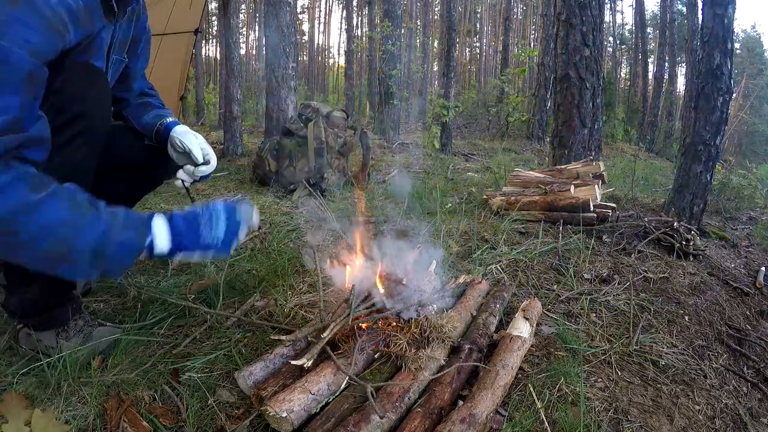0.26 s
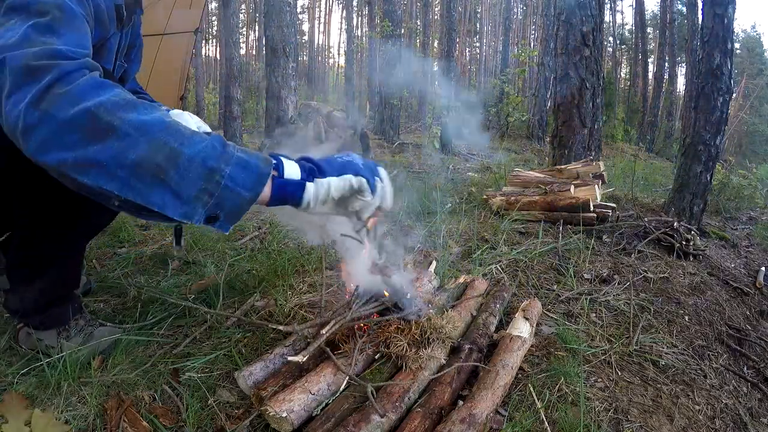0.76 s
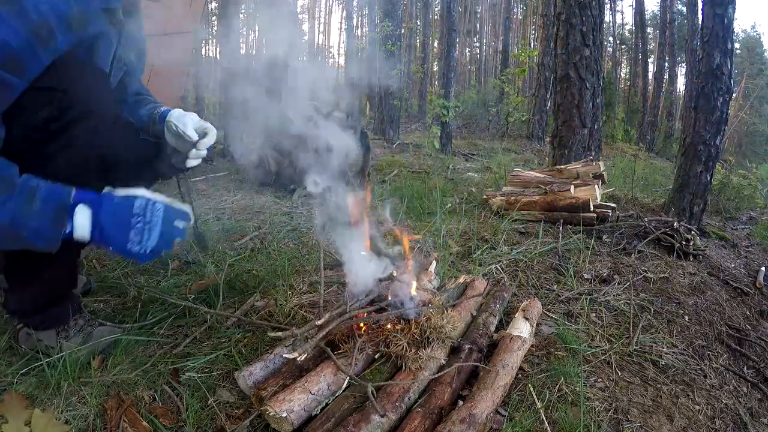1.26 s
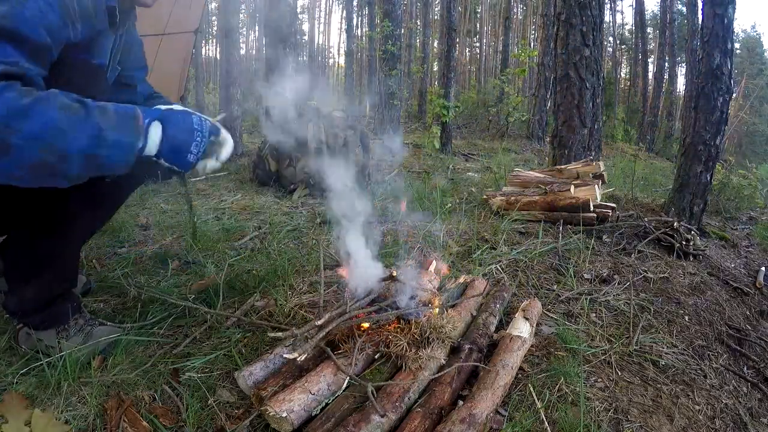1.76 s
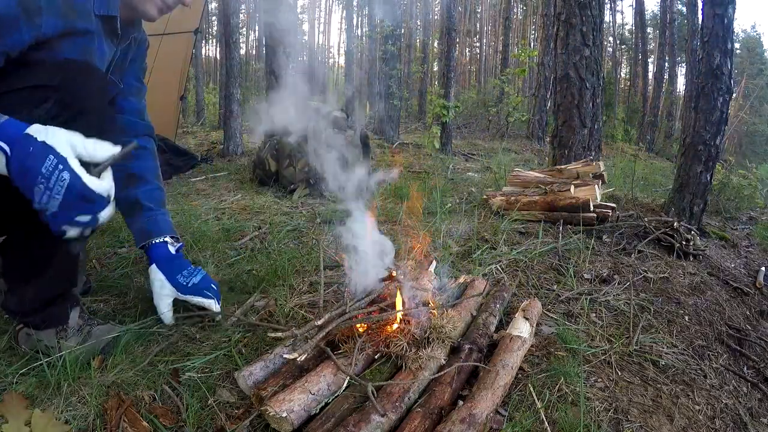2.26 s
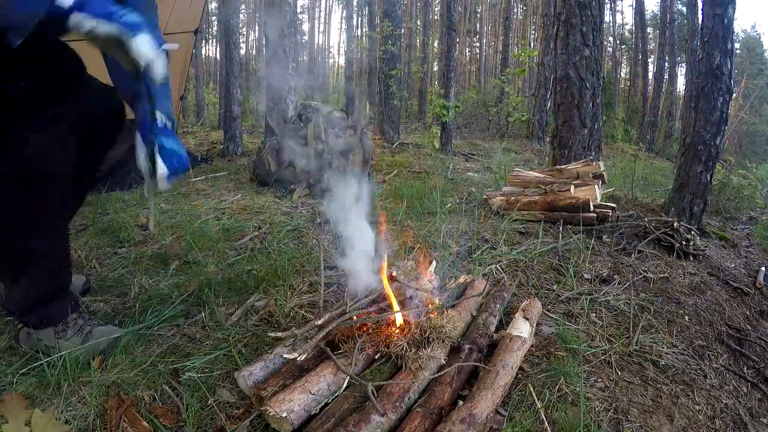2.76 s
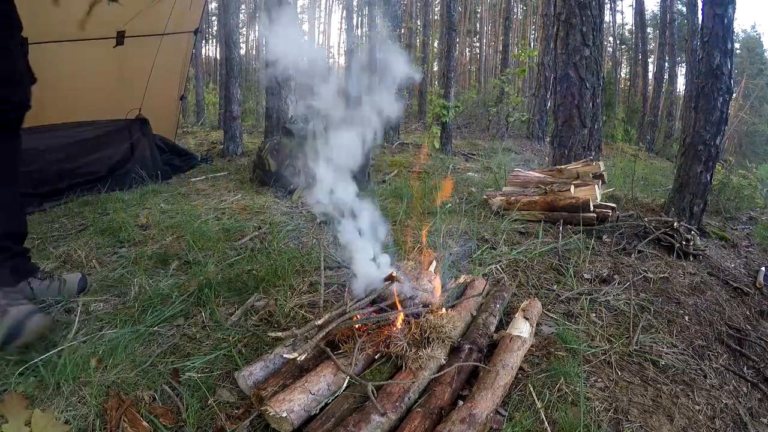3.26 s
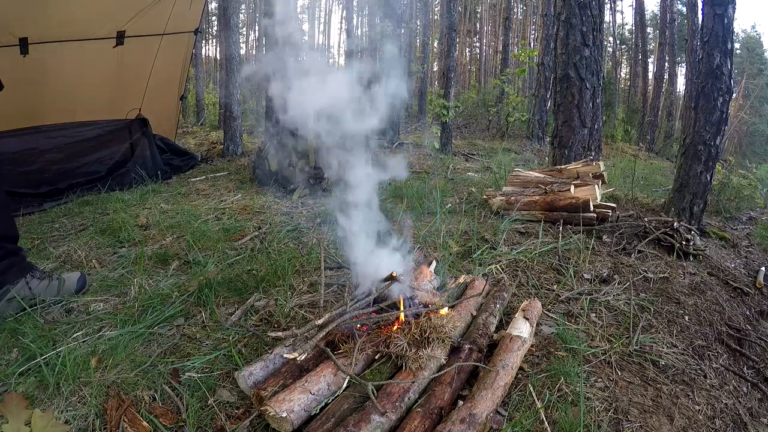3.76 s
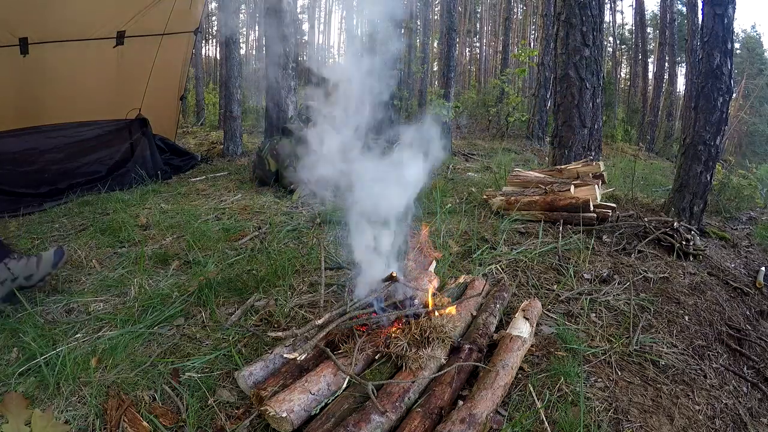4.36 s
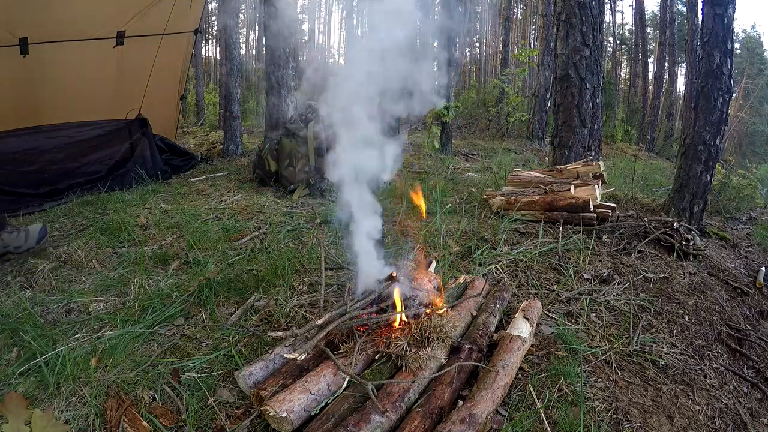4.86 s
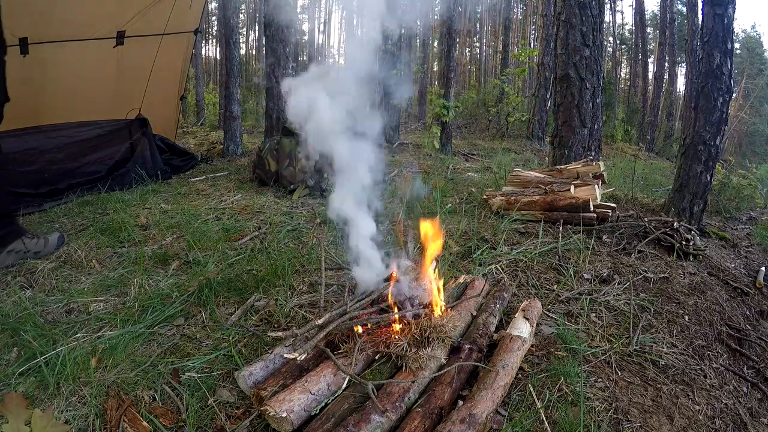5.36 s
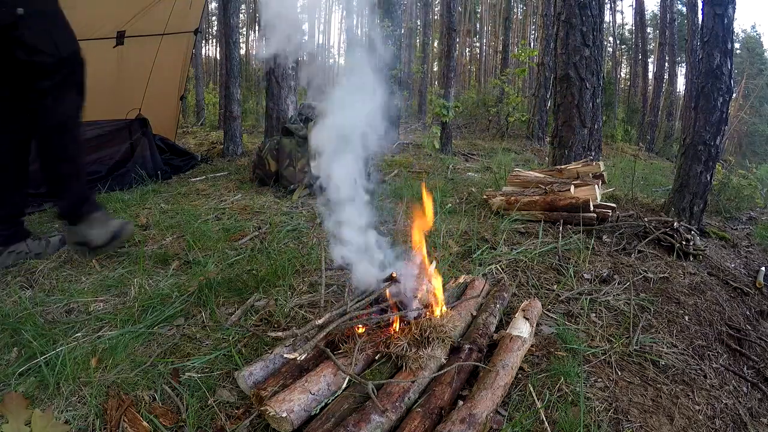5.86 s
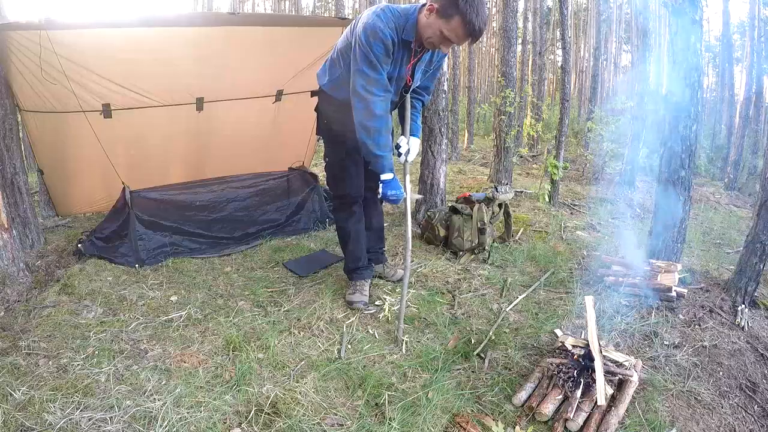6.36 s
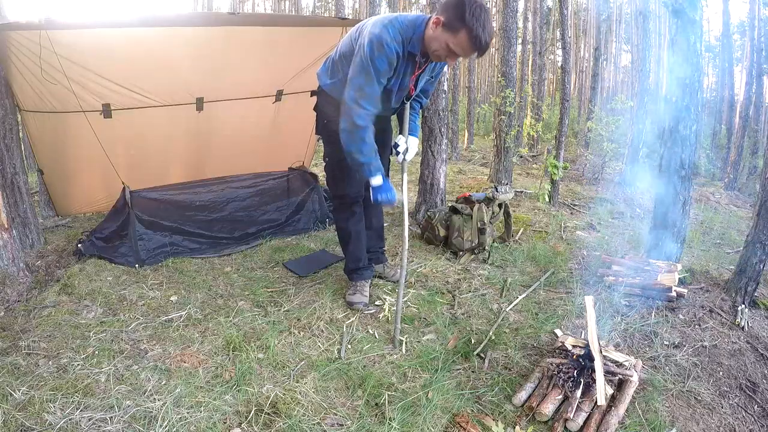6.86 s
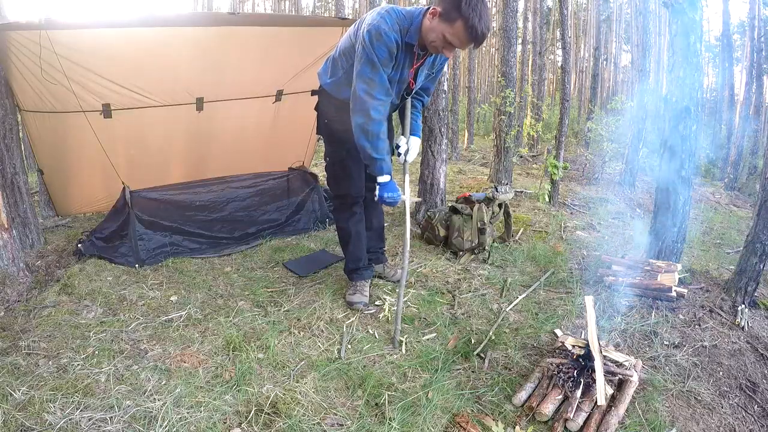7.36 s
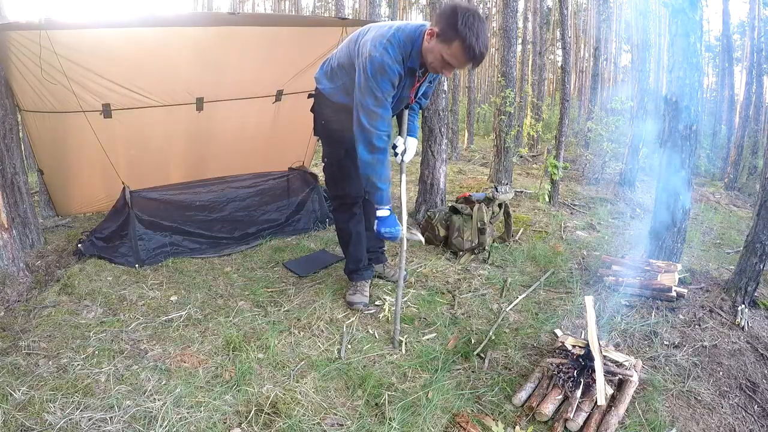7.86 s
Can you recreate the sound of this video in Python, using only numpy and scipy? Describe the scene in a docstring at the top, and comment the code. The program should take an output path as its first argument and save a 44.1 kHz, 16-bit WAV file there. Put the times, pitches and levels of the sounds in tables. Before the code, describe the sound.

A small fire of dry grass and twigs burns close to the microphone in a quiet pine forest. From the start, fine irregular crackle, thin hiss and low fluttering flames run under sharp dry snaps, one strong at 0.55 s, more at 1.5 to 1.9 s. Soft low puffs of gas come between them. From 2.2 to 3.5 s the snaps are densest and loudest, peaking with a hard crack at 3.5 s. They then thin out, with a soft puff near 5.2 s and another cluster from 5.6 to 6.1 s. Light boot scuffs in grass pass around 2.2, 3.9 and 5.9 s; far chirps and low hoots at 3.3 and 5.7 s are faint. At 6.3 s the fire stops instantly. Quiet, slightly bassy air remains, with distant chirps clustering around 6.8 to 7.4 s and very faint knife scrapes on a stick until about 7.8 s.

```python
"""A fire of dry grass and twigs burns on logs in a pine forest, close to the microphone.
From the start there is quiet air, and hiss, fluttering flames and crackle made from noise and tiny pulses.
Far birds (gliding tones), sharp snaps (ringing pulses), boots in grass (grainy noise) and soft puffs join in.
At about 6.3 s the fire sound stops at once; the air and birds go on.
Then a knife strokes faintly along a stick (short bands of noise)."""
import sys
import numpy as np
from scipy import signal
from scipy.fft import rfft, irfft, next_fast_len
from scipy.io import wavfile
from scipy.ndimage import uniform_filter1d

SR = 44100
rng = np.random.default_rng(int(sys.argv[2]) if len(sys.argv) > 2 else 0)


def store_wav(level_fs):
    """Save 16-bit WAV to argv[1]."""
    pcm = np.round(np.clip(np.atleast_2d(level_fs), -1, 1) * 32767)
    wavfile.write(sys.argv[1], SR, pcm.T.astype(np.int16))


N = 357650
TIME = np.arange(N) / SR
FIRE_END_S = 6.275


def amp(db):
    """Turns decibels into a plain multiplier."""
    return 10 ** (np.asarray(db) / 20)


def evened(x):
    """Scales a signal to an average (rms) strength of 1."""
    return x / np.sqrt(np.mean(x ** 2) + 1e-20)


def read(points, hz):
    """Reads a spectrum between its points, with pitch spaced as the ear hears it (log frequency)."""
    f, value = np.transpose(points)
    return np.interp(np.log(hz + 1), np.log(f + 1), value)


def add(mix, s, sound):
    """Mixes a sound in, starting at s seconds."""
    part = mix[max(round(s * SR), 0):][:len(sound)]
    part += sound[:len(part)]


def noise(spectrum, patchy_db, size=512):
    """Coloured noise of rms 1 whose level drifts in small patches of time and pitch."""
    _, _, z = signal.stft(rng.standard_normal(N), SR, nperseg=size)
    patches = uniform_filter1d(rng.standard_normal(z.shape), size=14, axis=0)
    patches = evened(uniform_filter1d(patches, size=5, axis=1))
    white = signal.istft(z * amp(patchy_db * patches), SR, nperseg=size)[1][:N]
    count = next_fast_len(N)
    colour = amp(read(spectrum, np.fft.rfftfreq(count, 1 / SR)))
    return evened(irfft(rfft(white, count) * colour, count)[:N])


# How long the trunks and ground scatter sound, before scaling: (frequency [Hz], time to fall 60 dB [s])
FOREST_RING = [(200, 0.14), (2000, 0.34), (6000, 0.48), (15000, 0.46)]


def scatter(x, t60_scale, delay_s=0, size=256):
    """Sparse random echoes, as from ground and trunks; the low pitches die away soonest."""
    taps = rng.standard_normal(SR // 2) * (rng.random(SR // 2) < .12)
    hz, t, z = signal.stft(taps, SR, nperseg=size)
    t60_s = t60_scale * read(FOREST_RING, hz)[:, None]
    tail = signal.istft(z * amp(-60 * t / t60_s), SR, nperseg=size)[1]
    delayed = np.pad(tail, (max(round(delay_s * SR), 0), 0))
    return signal.fftconvolve(x, delayed / np.linalg.norm(tail))[:N]


def causal(db):
    """Spectra of the sharpest pulses with these levels that make no sound before they start."""
    log_gain = np.log(amp(np.concatenate([db, db[:, -2:0:-1]], axis=1)))
    return np.exp(np.conj(signal.hilbert(log_gain, axis=1)))[:, :db.shape[1]]


# Basic colour of a bursting stem, before dulling and ringing: (frequency [Hz], relative level [dB per Hz])
BURST_COLOUR = [(60, -18), (250, -11), (900, -8.5), (2000, -3.5), (3000, -5), (5000, 0.5), (6500, -1),
                (8500, -3.5), (12000, 0), (15500, 1)]


def bursts(corner_hz, splinter, stem_hz, stem_db, stem_octaves=0.52, overtone_share=0.16, uneven_db=1.4,
           splinter_s=0.0031, heard_hz=600, size=512):
    """One pulse a stem, duller for slow bursts and coloured by its ring, then a rattle of tearing fibres."""
    hz, t = np.fft.rfftfreq(size, 1 / SR), np.arange(size) / SR
    chance = rng.standard_normal((len(corner_hz), 2, size))
    own_colour = uneven_db * evened(uniform_filter1d(chance[:, 0, :len(hz)], size=9, axis=1))
    dulling = 20 * np.log10(1 + (hz / corner_hz[:, None]) ** 2)
    # a stem rings like a rod: its first two bending modes
    first = np.log2((hz + 1) / stem_hz[:, None])
    second = first - np.log2(2.76)
    ring = 1 / (1 + (first / stem_octaves) ** 2) + overtone_share / (1 + (second / stem_octaves) ** 2)
    colour = causal(read(BURST_COLOUR, hz) - dulling + stem_db[:, None] * ring + own_colour)
    rattle = chance[:, 1] * np.exp(-t / splinter_s) * (1 - np.exp(-t / 0.00017))
    fibres = rfft(rattle, axis=1)
    # set the energy as weighed by a high-pass curve, so deep rumble does not count
    heard = hz ** 2 / np.sqrt(hz ** 4 + heard_hz ** 4)
    share = np.clip(splinter, .01, .95)[:, None]
    out = 0
    for z, part in ((colour, 1 - share), (colour * fibres, share)):
        energy = np.sum(irfft(z * heard, axis=1) ** 2, axis=1, keepdims=True)
        out = out + irfft(z, axis=1) * np.sqrt(part / energy * SR / 1000)  # rms 1 over 1 ms
    return out


def thumps(rows, cycles=0.3, rush_db=-16, rush_hz=900):
    """A soft push of air: one or two slow swings of pressure, with a brief dull rush."""
    t, out = np.arange(SR // 16) / SR, np.zeros(N)
    for s, db, hz in rows:
        age = t * hz / cycles
        swell = age * np.exp(1 - age)
        rush = evened(signal.lfilter(*signal.butter(2, rush_hz, fs=SR), rng.standard_normal(len(t))))
        add(out, s, amp(db) * swell * (np.sin(2 * np.pi * hz * t) + amp(rush_db) * rush))
    return out


# Colour of the forest air: (frequency [Hz], relative level [dB per Hz])
AIR_COLOUR = [(12, -21), (20, -2), (49, -4.5), (120, -14.5), (150, -19), (319, -21.5), (357, -22.5),
              (825, -25.5), (1710, -27.5), (2140, -27), (2820, -27.5), (3160, -26.5), (6720, -34.5),
              (13500, -42.5), (16000, -46)]


def forest_air(level_db=-58.76):
    """Still air: steady soft noise, strongest in the bass."""
    return amp(level_db) * noise(AIR_COLOUR, patchy_db=1.5)


# Heat of the embers, as the base level for hiss and fine crackle: (time [s], level [dB])
EMBER_HEAT = [(0.0, -62), (0.7, -62.5), (1.5, -65), (2.4, -60.5), (3.65, -59.5), (4.4, -66), (5.0, -64),
              (5.55, -58), (5.95, -59.5), (6.25, -64.5)]


def embers():
    """The rise and fall of the embers' heat, as a level in dB at every moment."""
    return np.interp(TIME, *np.transpose(EMBER_HEAT))


# Colour of the hiss: (frequency [Hz], relative level [dB per Hz])
HISS_COLOUR = [(150, 1), (250, -3.5), (429, -2.5), (686, 8.5), (860, -16), (1380, 2), (2670, -5.5),
               (4730, -5.5), (7570, -22), (14200, -14.5), (15200, -40), (16000, -44)]


def hiss(ember_db, gain_db=-3.5):
    """A soft, patchy noise that follows the heat of the embers."""
    return amp(ember_db + gain_db) * noise(HISS_COLOUR, patchy_db=4.5)


# Colour of the flames' flutter: (frequency [Hz], relative level [dB per Hz])
FLUTTER_COLOUR = [(12, -28), (22, 0.5), (38, 1.5), (70, -1), (125, -7), (200, -12.5), (280, -18.5),
                  (450, -24), (700, -27), (1500, -48)]
# The flames leap up for a moment: (time of the height [s], length [s], rise [dB])
FLAME_FLARES = [(0.083, 0.062, 10), (1.282, 0.19, 2.5), (3.683, 0.072, 8.5), (4.583, 0.089, 6),
                (5.796, 0.054, 5)]


def flames(mean_db=-50.5, waver_db=2.2, quickest_hz=9, count=24):
    """A low flutter of noise that wavers at random and swells with each flare."""
    waver = np.zeros(N)
    for hz in np.geomspace(1, quickest_hz, count):
        waver += np.sin(2 * np.pi * (hz * TIME + rng.random()))
    level_db = mean_db + waver_db * evened(waver)
    for s, length, rise_db in FLAME_FLARES:
        level_db += rise_db * np.exp(-(2 * (TIME - s) / length) ** 2)
    return amp(level_db) * noise(FLUTTER_COLOUR, patchy_db=1.55)


def crackle(ember_db, per_s=150, over_db=3, spread_db=3.5, dull_hz=1200, bright_hz=9500, count=32):
    """Many thin blades burst faintly at random, their level following the heat of the embers."""
    corner_hz = np.geomspace(dull_hz, bright_hz, count)
    kinds = bursts(corner_hz, np.full(count, .08), rng.permutation(corner_hz), np.full(count, 12.))
    out = np.zeros(N)
    for when, kind, luck in rng.random((int(per_s * N / SR), 3)):
        size_db = spread_db * min(-np.log(luck), 3.5)  # mostly small, a few large
        add(out, when * N / SR, amp(over_db + size_db) * kinds[int(kind * count)])
    return out * amp(ember_db)


# Bird notes: (time [s], length [s], start pitch [Hz], end pitch [Hz], level before the direct and echo
# gains [dB], buzz [share of the pitch])
BIRD_NOTES = [(.008, 0.06, 693, 618, -54, 0.016), (0.07, 0.08, 2550, 2980, -60, 0.06),
              (0.153, 0.037, 2680, 2840, -58, 0.048), (0.257, 0.069, 2800, 3260, -58, 0.049),
              (0.313, 0.086, 3310, 3830, -62, .04), (0.654, .06, 5700, 5130, -72, 0.02),
              (1.003, 0.091, 3950, 3980, -66, .007), (1.38, 0.073, 4150, 4220, -71, .004),
              (2.057, 0.092, 3890, 3270, -64, 0.041), (2.837, 0.077, 2150, 1990, -62, 0.057),
              (3.283, 0.05, 2250, 2160, -63, 0.035), (3.33, 0.3, 505, 508, -57.5, 0.0046),
              (4.354, .19, 5480, 3800, -71, 0.0036), (4.689, 0.36, 3840, 3720, -73, 0.018),
              (5.68, 0.32, 514.6, 514, -58.5, 0.004), (6.27, 0.082, 2200, 2200, -72, 0.012),
              (6.795, 0.036, 2580, 2720, -67, 0.047), (6.83, 0.038, 2720, 2890, -61, .025),
              (6.946, 0.085, 2560, 2700, -69, 0.045), (7.006, 0.034, 2810, 2950, -63, 0.023),
              (7.195, 0.059, 2760, 2420, -63, 0.06), (7.247, 0.042, 2800, 2980, -62.5, 0.03),
              (7.34, 0.085, 2860, 2610, -73, 0.054), (7.413, 0.042, 2620, 2776, -64, 0.045),
              (7.802, 0.14, 1734, 1720, -73, 0.01), (7.865, .025, 4200, 4100, -71, .01),
              (7.93, 0.19, 2340, 2260, -72, .032), (8.017, 0.08, 3930, 3790, -70, .02)]


def birds(direct_db=-1, echo_db=-3.5, flutter_per_buzz=9):
    """Far whistles, chirps and low hoots, blurred by the forest; buzz shakes both pitch and level."""
    out = np.zeros(N)
    for s, length, start_hz, end_hz, db, buzz in BIRD_NOTES:
        count = int(length * SR)
        chance = rng.standard_normal((2, SR))
        wobble, flutter = evened(uniform_filter1d(chance, size=120, axis=1))[:, :count]
        hz = np.geomspace(start_hz, end_hz, count) * (1 + buzz * wobble)
        note = np.sin(2 * np.pi * np.cumsum(hz) / SR) * np.exp(flutter_per_buzz * buzz * flutter)
        add(out, s, amp(db) * evened(note) * signal.windows.tukey(count, .6))
    return amp(direct_db) * out + amp(echo_db) * scatter(out, t60_scale=1.9)


# Loud bursts of stems and twigs, with a few dull knocks of twigs laid down by hand (near 1.11 s and 1.2 s):
# (time [s], level over 1 ms [dB], brightness corner [Hz], # energy in the splintering after the burst [share
# 0-1], stem resonance [Hz], resonance height [dB])
STEM_SNAPS = [(0.0205, -40, 1800, 0.0, 9750, 9), (0.0302, -28.5, 3800, 0.24, 12000, 7.5),
              (0.0747, -39.5, 2100, 0.06, 7150, 13), (0.1422, -39, 2400, 0.26, 4260, 26),
              (0.161, -43, 5200, 0.05, 3120, 9), (0.2368, -32, 18000, 0.05, 1360, 4),
              (0.2453, -40.5, 2400, 0.3, 1230, 8), (0.371, -38, 700, 0.2, 12000, 17),
              (0.3943, -34, 2400, 0.06, 6940, 18), (0.4743, -39.5, 3300, 0.03, 9750, 6),
              (0.5501, -17.0, 18000, 0, 6800, 4.5), (0.5813, -37.5, 3300, 0.1, 9750, 4),
              (0.635, -40.0, 700, 0.6, 1860, 2), (0.7143, -37.5, 1000, 0.17, 3120, 6),
              (0.8554, -42, 7100, 0.03, 1230, 6), (0.9094, -42.5, 2100, 0, 12000, 18),
              (0.9322, -38, 1790, 0, 7930, 8), (1.1083, -37.5, 1000, 0.3, 1680, 6),
              (1.1264, -31.5, 1500, 0.09, 3120, 4.5), (1.1665, -42.5, 1100, 0, 3120, 13),
              (1.1934, -32, 2100, 0.02, 1860, 5), (1.199, -37, 800, 0.31, 1680, 12),
              (1.2959, -34.5, 1300, 0.02, 1850, 3.5), (1.473, -41.5, 2400, 0.2, 3120, 8),
              (1.4935, -21.5, 18100, 0, 4800, 6), (1.5298, -39.5, 1300, 0.1, 3120, 6),
              (1.5661, -37.5, 1500, 0.26, 1510, 2), (1.6034, -32.5, 2100, 0.05, 12000, 4),
              (1.6119, -40, 5200, 0.2, 4720, 4), (1.7044, -27, 18000, 0, 9750, 3),
              (1.7197, -29.5, 2400, 0.01, 10820, 13.5), (1.7428, -34.0, 1100, 0.4, 2810, 5),
              (1.8437, -26.0, 18000, 0.09, 1360, 3.5), (1.8787, -40, 2800, 0.45, 12000, 9),
              (1.9133, -39.0, 1800, 0.1, 5810, 1), (1.9187, -37, 2800, 0, 7930, 6),
              (1.972, -37, 4500, 0.01, 1360, 2), (1.9792, -37.5, 1800, 0.14, 7930, 6),
              (2.0066, -41, 1100, 0, 1360, 7), (2.0314, -43.5, 800, 0.17, 3460, 18),
              (2.1216, -36.5, 3800, 0.4, 10820, 6), (2.1456, -44, 3800, 0.0, 10820, 5),
              (2.1588, -34.5, 9700, 0.02, 7930, 10), (2.1947, -20.0, 18000, 0, 8650, 5),
              (2.3166, -39.0, 3300, 0.58, 12000, 9), (2.43, -34.5, 3300, 0.5, 10820, 11),
              (2.456, -32.0, 3300, 0.09, 9750, 7), (2.5074, -38.5, 704, 0.2, 2060, 5),
              (2.581, -18.0, 18000, 0, 9750, 2.5), (2.6238, -34, 3800, 0, 12000, 4),
              (2.6662, -37, 5200, 0.14, 4720, 3), (2.6993, -33.5, 13200, 0.03, 7150, 17),
              (2.7093, -15.0, 18000, 0.06, 2810, 9), (2.7246, -29.0, 3800, 0.13, 1680, 5),
              (2.7549, -35, 1000, 0.02, 2810, 7), (2.76, -41.5, 1000, 0.18, 3120, 8),
              (2.8211, -22, 3800, 0, 5730, 9.5), (2.8931, -25.5, 15400, 0, 7040, 7.5),
              (2.9085, -38, 2100, 0.25, 2810, 14), (2.9643, -29, 8300, 0.01, 5270, 6),
              (2.999, -39.5, 700, 0, 1510, 7), (3.011, -36.5, 3800, 0.4, 9750, 5),
              (3.045, -16.0, 15400, 0, 1360, 1.5), (3.0848, -29, 8300, 0.5, 1350, 0),
              (3.1322, -34.0, 18000, 0.03, 1860, 8), (3.1734, -25.5, 2820, 0, 7900, 9),
              (3.1917, -35, 1500, 0.06, 1680, 3), (3.2208, -37.5, 5200, 0.01, 6440, 1),
              (3.2576, -36.5, 1800, 0.7, 2060, 13), (3.2752, -33.5, 1500, 0.7, 9750, 9),
              (3.3918, -38, 800, 0.3, 1680, 0), (3.4527, -16.5, 18000, 0.23, 4260, 5.5),
              (3.472, -40, 700, 0.3, 9750, 5), (3.4896, -26, 5200, 0.04, 1860, 6),
              (3.5095, -11, 18200, 0.22, 2050, 8.5), (3.528, -26.0, 2800, 0.04, 9750, 17),
              (3.5449, -25.0, 3800, 0.08, 2810, 13), (3.6559, -36.5, 7100, 0.08, 1510, 8),
              (3.6606, -34.5, 1500, 0.06, 2060, 1.5), (3.7023, -38.0, 3300, 0.5, 12000, 7),
              (3.7158, -36.5, 6100, 0, 3840, 8), (3.7308, -43, 8300, 0.13, 7930, 3),
              (3.7858, -42.5, 6100, 0.06, 1360, 5), (3.827, -32.0, 2100, 0.03, 10820, 18),
              (3.8373, -26, 13200, 0, 1110, 8.5), (3.9546, -41.5, 1000, 0, 7930, 5),
              (3.9726, -42.5, 4500, 0.05, 1110, 5), (4.1065, -43.5, 1000, 0.26, 2060, 5),
              (4.128, -32.0, 3280, 0.01, 12000, 7), (4.2264, -37.5, 13200, 0.1, 1680, 9),
              (4.2368, -42.5, 1800, 0.2, 2810, 1), (4.246, -38.5, 3770, 0.2, 8790, 5),
              (4.2564, -34.5, 1000, 0.08, 12000, 5), (4.2914, -33.5, 3800, 0.2, 1360, 8),
              (4.3364, -26, 18000, 0.03, 3460, 4), (4.5215, -22.5, 6100, 0.22, 10820, 4),
              (4.6593, -42.5, 1300, 0.4, 7930, 19), (4.6879, -39, 1300, 0.1, 2540, 9),
              (4.6937, -26.5, 6100, 0.04, 2030, 8.5), (4.7094, -39, 5200, 0.3, 10820, 11),
              (4.8929, -41, 1500, 0.2, 9750, 13), (4.898, -40.5, 700, 0.35, 12000, 2),
              (4.9834, -32.5, 1100, 0.12, 1860, 10.5), (5.0279, -43, 1100, 0.3, 5810, 8),
              (5.0371, -43.5, 2400, 0, 3460, 11), (5.0586, -43, 1800, 0, 7930, 7),
              (5.0893, -41, 11300, 0, 7930, 9), (5.106, -28.5, 3400, 0.05, 11900, 14.5),
              (5.273, -30.0, 4500, 0.03, 4260, 4), (5.2804, -40, 9700, 0.5, 10820, 11),
              (5.3784, -37.5, 2400, 0.15, 1860, 4), (5.3852, -28.5, 5200, 0, 7930, 6),
              (5.5497, -35, 1300, 0.5, 1680, 7), (5.5735, -21.5, 8300, 0, 12000, 10),
              (5.6034, -21.5, 13200, 0, 7930, 5), (5.6417, -35.0, 8300, 0, 4260, 4),
              (5.7272, -37.5, 2400, 0.1, 12000, 6), (5.7954, -33.0, 3800, 0.2, 7930, 9),
              (5.8264, -25.5, 9700, 0.28, 1580, 12), (5.964, -42.5, 1500, 0.11, 3120, 7),
              (6.0474, -32, 1500, 0, 1680, 10), (6.0742, -27.5, 2800, 0.03, 2540, 6),
              (6.0962, -21.5, 6100, 0.01, 2080, 6), (6.2342, -41, 1800, 0, 1860, 4)]


def snaps(clean_share=0.045):
    """The loud bursts, and the part that enters the log pile: a twig that splinters shakes it most."""
    s, db, corner_hz, splinter, stem_hz, stem_db = np.transpose(STEM_SNAPS)
    pulses = amp(db)[:, None] * bursts(corner_hz, splinter, stem_hz, stem_db)
    direct, shake = np.zeros((2, N))
    for at, pulse, share in zip(s, pulses, splinter):
        add(direct, at, pulse)
        add(shake, at, pulse * np.sqrt(clean_share + abs(share)))
    return direct, shake


def pops(db=-43.5, per_s=9, chained=.55, lag_s=.03, dull_hz=800, bright_hz=4000, splinter=0.18,
         stem_db=11, low_stem_hz=1400, high_stem_hz=13000):
    """Smaller stems burst with their own brightness and ring; many are set off by a loud snap before."""
    when, speed, stem, chain, lag = rng.random((int(per_s * FIRE_END_S), 5)).T
    snap_s = np.transpose(STEM_SNAPS)[0][(when * len(STEM_SNAPS)).astype(int)]
    after_snap = snap_s - lag_s * np.log(lag)
    starts = np.where(chain < chained, after_snap, when * FIRE_END_S)
    corner_hz = dull_hz * (bright_hz / dull_hz) ** speed
    stem_hz = low_stem_hz * (high_stem_hz / low_stem_hz) ** stem
    alike = np.ones(len(when))
    out = np.zeros(N)
    for s, pulse in zip(starts, bursts(corner_hz, splinter * alike, stem_hz, stem_db * alike)):
        add(out, s, amp(db) * pulse)
    return out


# Boots and sleeves brushing through grass: (time [s], length [s], level before the swell [dB],
# brightness corner [Hz])
GRASS_SCUFFS = [(0.022, 0.14, -53, 2500), (1.17, 0.057, -55, 9000), (2.187, 0.33, -55.5, 6960),
                (3.2, 0.14, -57.5, 3000), (3.918, 0.17, -54.5, 5030), (5.842, 0.043, -51, 2000),
                (5.871, 0.16, -54.5, 4530), (5.998, 0.076, -52.5, 1500), (6.176, 0.073, -53, 1200)]
# Colour of the rustling grass: (frequency [Hz], relative level [dB per Hz])
GRASS_COLOUR = [(60, -20), (300, 2.5), (800, -5), (2000, -8), (6000, -12), (16000, -5)]


def scuffs(grain=0.17):
    """Each brush through the grass is a grainy rustle that rises quickly and trails off."""
    out, rustle = np.zeros(N), noise(GRASS_COLOUR, patchy_db=0.5)
    grains = evened(uniform_filter1d(rng.standard_normal(N), size=90))
    rustle = evened(rustle * np.exp(grain * grains))
    for s, length, db, corner_hz in GRASS_SCUFFS:
        piece = rustle[int(s * SR):][:int(length * SR)]
        piece = signal.lfilter(*signal.butter(2, corner_hz, fs=SR), piece)
        swell = np.sin(np.pi * np.sqrt(np.linspace(0, 1, len(piece)))) ** 2
        add(out, s, amp(db) * swell * evened(piece))
    return out


def small_puffs(db=-48, spread_db=4, per_s=13, low_hz=170, high_hz=700):
    """Little pockets of gas that catch at random, as rows (time [s], level [dB], pitch [Hz])."""
    when, size, pitch = rng.random((int(per_s * FIRE_END_S), 3)).T
    level_db = db + spread_db * (2 * size - 1)
    return zip(when * FIRE_END_S, level_db, low_hz * (high_hz / low_hz) ** pitch)


# Larger pockets of gas catching: (time [s], peak level of the swell [dB], pitch [Hz])
GAS_PUFFS = [(0.366, -32.5, 112), (0.636, -35, 114), (1.021, -35.5, 127), (1.116, -34, 101),
             (1.637, -36, 112), (1.735, -35, 110), (3.824, -37, 225), (4.522, -34, 197), (4.687, -43, 168),
             (4.891, -46, 223), (4.985, -37.5, 101), (5.169, -28, 152), (6.07, -38.5, 129)]


def puffs():
    """Pockets of gas catch, each giving the air a soft push."""
    return thumps(GAS_PUFFS) + thumps(small_puffs())


def fire(logs_db=-13, trees_db=-25, fade_s=0.0085):
    """Snaps rattle among the logs and echo from the trees, over hiss, flames and puffs, until a quick end."""
    ember_db = embers()
    direct, shake = snaps()
    small = pops()
    cracks = direct + small + crackle(ember_db)
    logs = amp(logs_db) * scatter(shake + small / 2, t60_scale=.17)
    trees = amp(trees_db) * scatter(cracks, t60_scale=0.22, delay_s=.006)
    burning = cracks + logs + trees + flames() + hiss(ember_db) + puffs()
    return burning * np.clip((FIRE_END_S - TIME) / fade_s, 0, 1)


# Knife strokes: (time [s], length [s], level before the swell [dB], centre of the scrape [Hz])
KNIFE_STROKES = [(6.44, 0.058, -57.5, 6860), (7.258, 0.061, -64, 14000), (7.395, 0.1, -62, 12000),
                 (7.418, 0.22, -67.5, 4800), (7.586, 0.15, -63, 3370), (7.798, 0.0037, -47, 9500)]
# The stick nudges the ground: (time [s], peak level of the swell [dB], pitch [Hz])
STICK_NUDGES = [(7.295, -47.5, 90)]


def knife(width_octaves=0.98):
    """Bands of noise for a blade scraping thin shavings off a stick that stands on the ground."""
    out = thumps(STICK_NUDGES)
    for s, length, db, centre_hz in KNIFE_STROKES:
        count = int(length * SR)
        octaves = np.log2((np.fft.rfftfreq(SR, 1 / SR) + 1) / centre_hz)
        band = 1 / (1 + (octaves / width_octaves) ** 2)
        scrape = irfft(rfft(rng.standard_normal(SR)) * band)[:count]
        add(out, s, amp(db) * np.hanning(count) * evened(scrape))
    return out


def scene():
    """Fire, birds, grass and knife in still forest air."""
    return (forest_air() + birds() + scuffs() + fire() + knife())[None]


def record(dry, swing_hz=3600, edge_hz=15700):
    """The microphone delays the lower part of each click a little, so it swings both ways; then a treble cut."""
    lag = np.exp(-2 * np.pi * swing_hz / SR)
    swung = signal.lfilter([lag, -1], [1, -lag], dry)
    treble_cut = signal.firwin(255, edge_hz, window=("kaiser", 9), fs=SR)
    return signal.oaconvolve(swung, treble_cut[None], "same")


dry = scene()
out = record(dry)
store_wav(out)
```